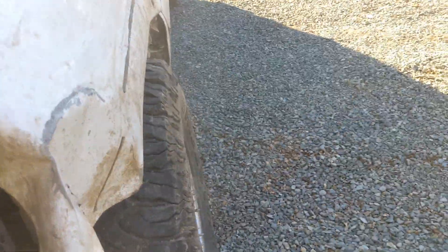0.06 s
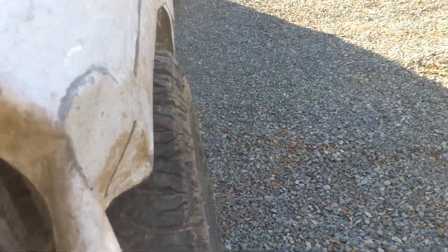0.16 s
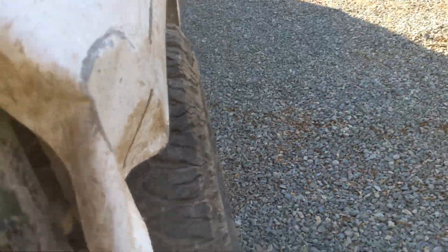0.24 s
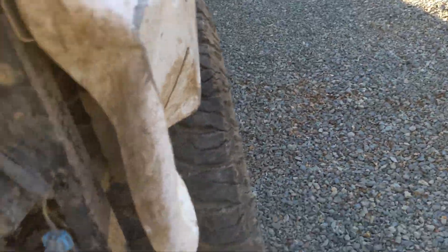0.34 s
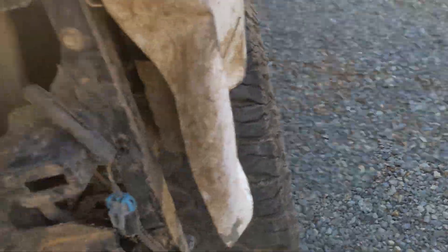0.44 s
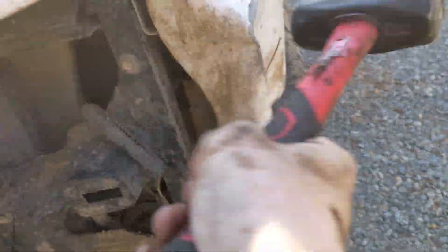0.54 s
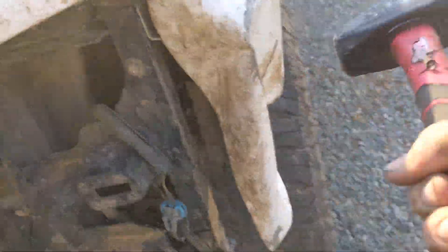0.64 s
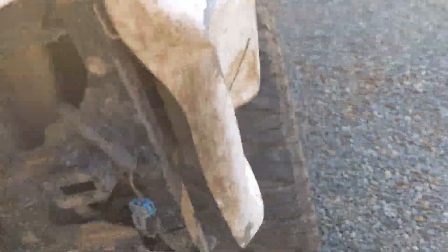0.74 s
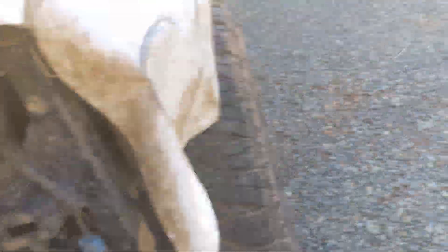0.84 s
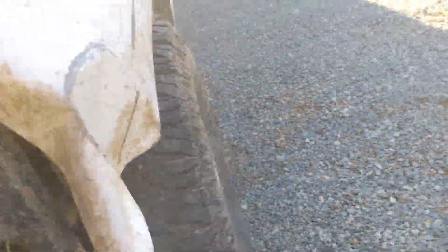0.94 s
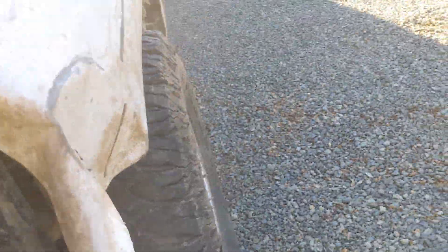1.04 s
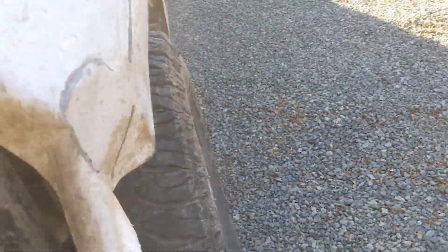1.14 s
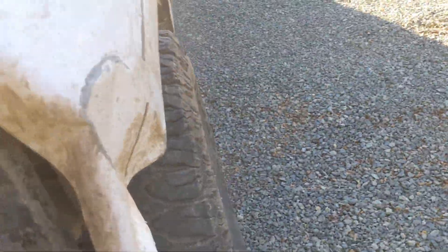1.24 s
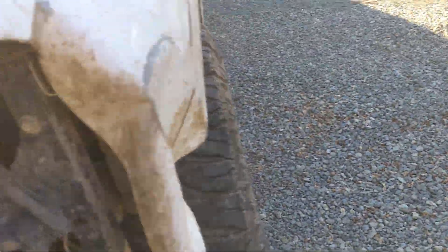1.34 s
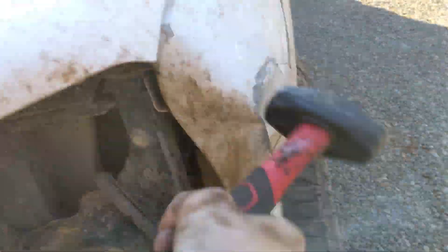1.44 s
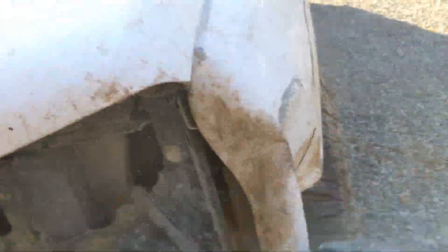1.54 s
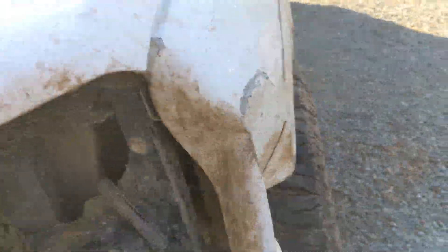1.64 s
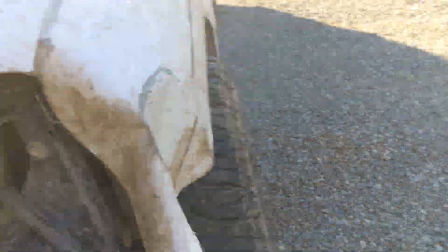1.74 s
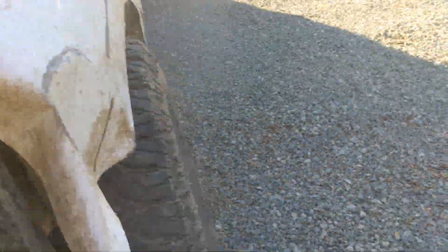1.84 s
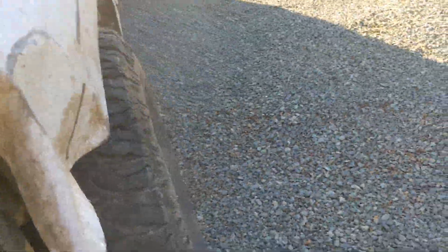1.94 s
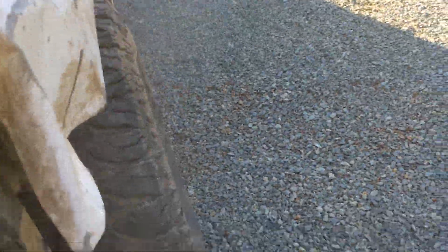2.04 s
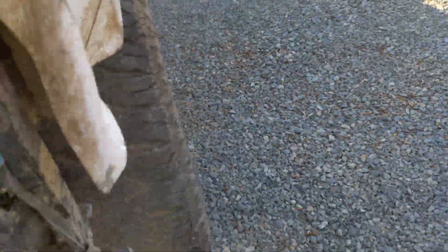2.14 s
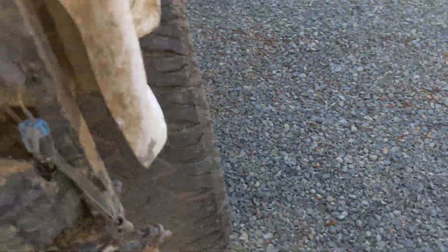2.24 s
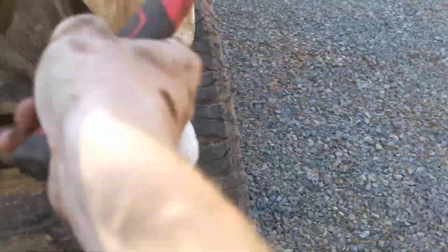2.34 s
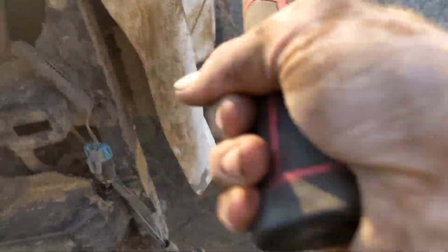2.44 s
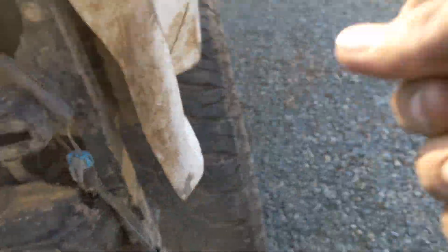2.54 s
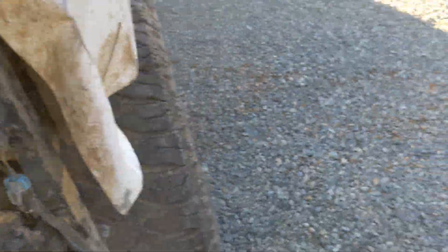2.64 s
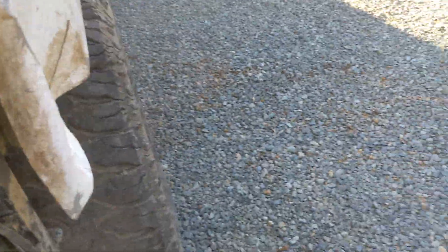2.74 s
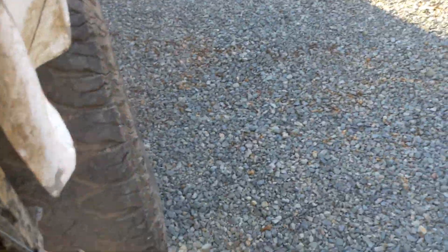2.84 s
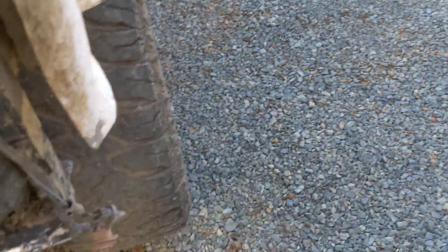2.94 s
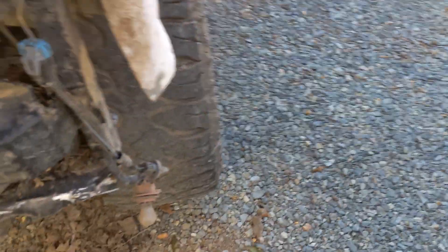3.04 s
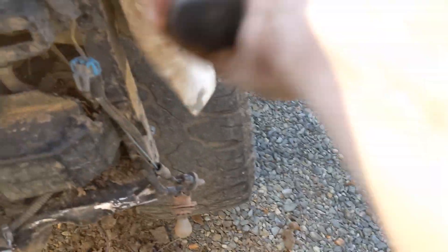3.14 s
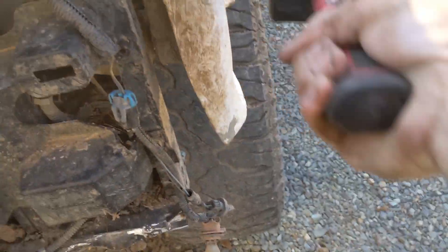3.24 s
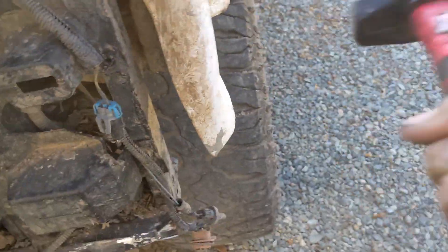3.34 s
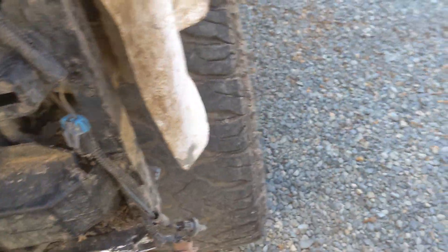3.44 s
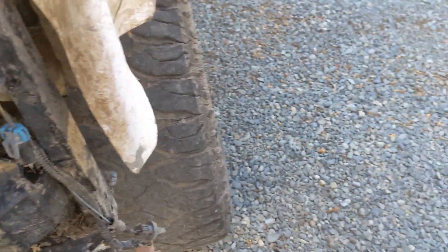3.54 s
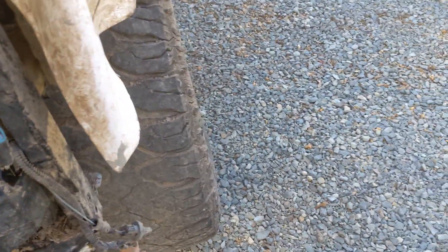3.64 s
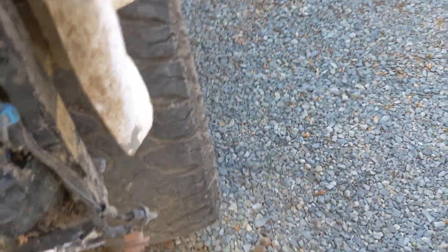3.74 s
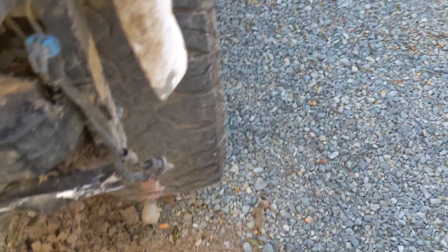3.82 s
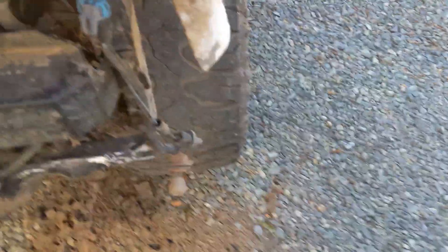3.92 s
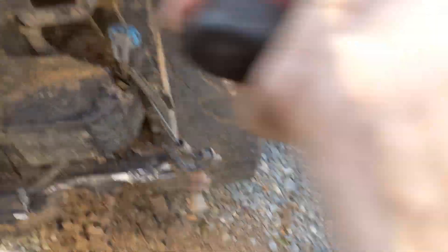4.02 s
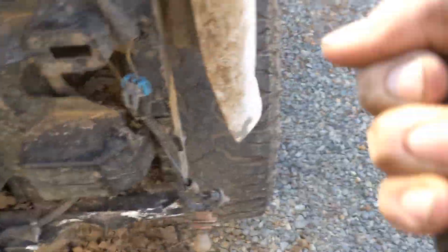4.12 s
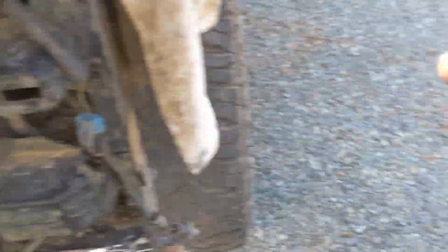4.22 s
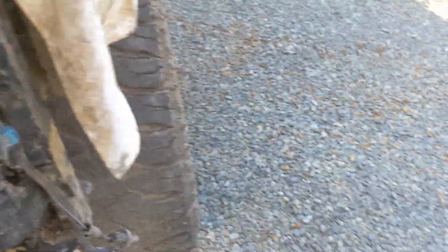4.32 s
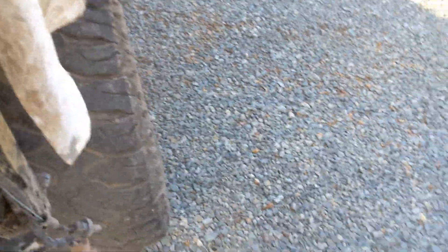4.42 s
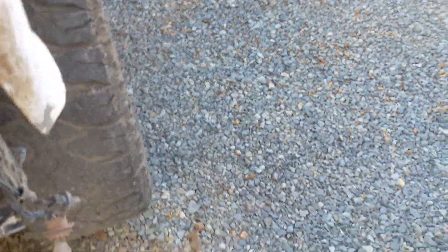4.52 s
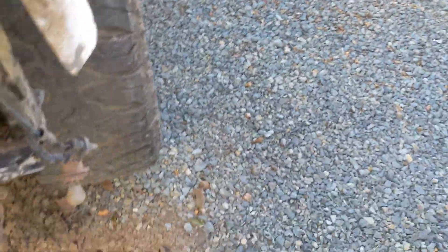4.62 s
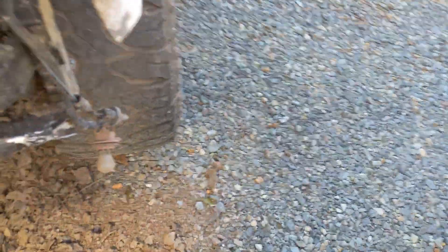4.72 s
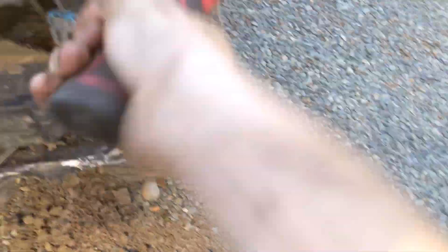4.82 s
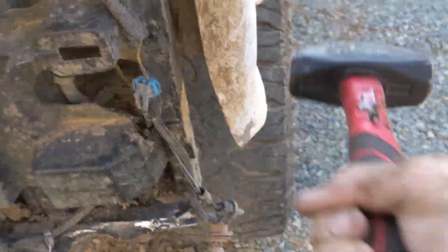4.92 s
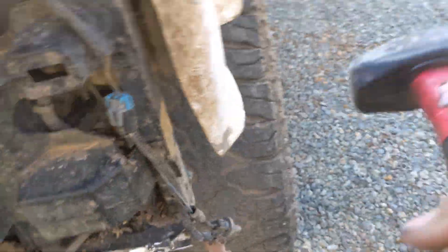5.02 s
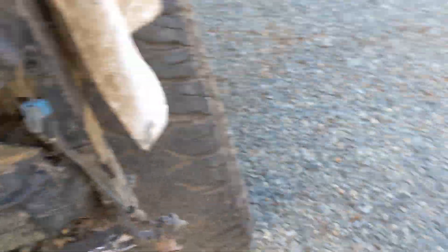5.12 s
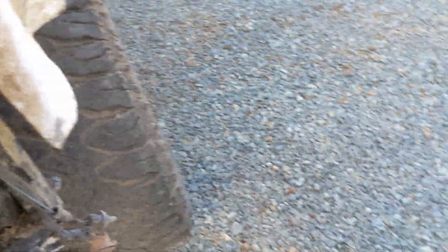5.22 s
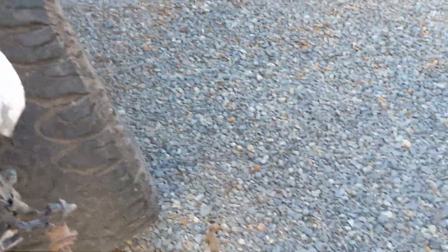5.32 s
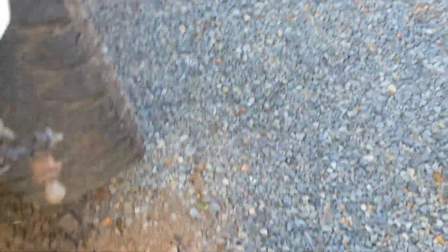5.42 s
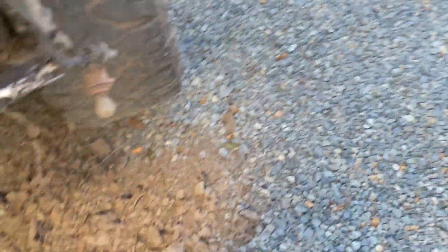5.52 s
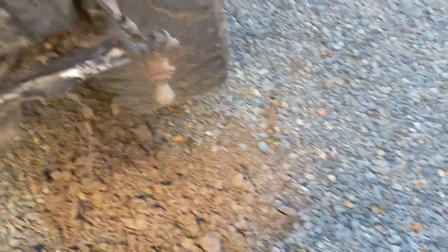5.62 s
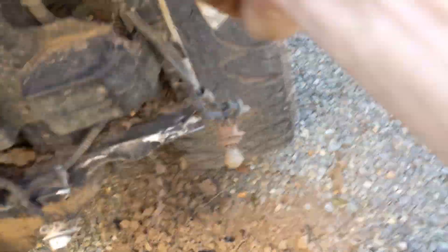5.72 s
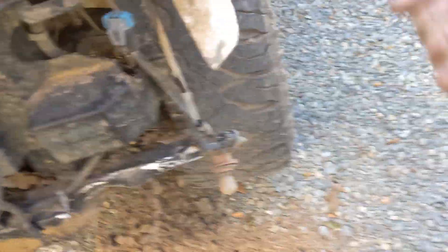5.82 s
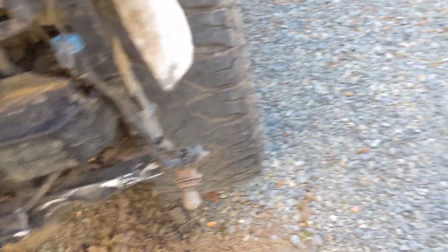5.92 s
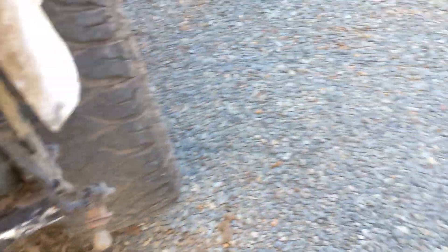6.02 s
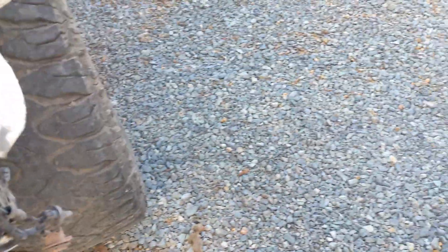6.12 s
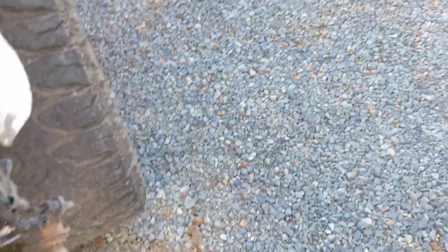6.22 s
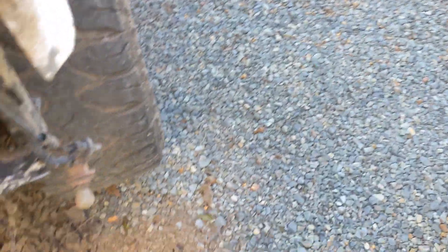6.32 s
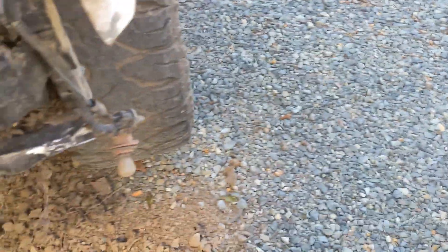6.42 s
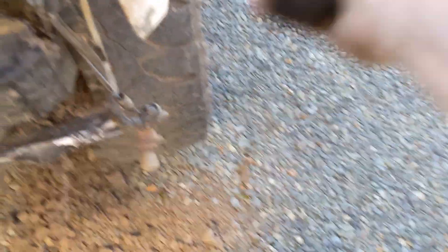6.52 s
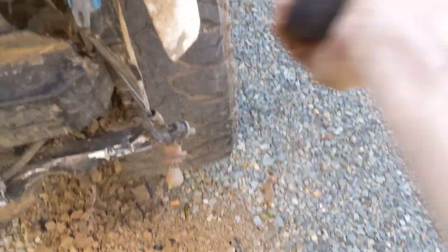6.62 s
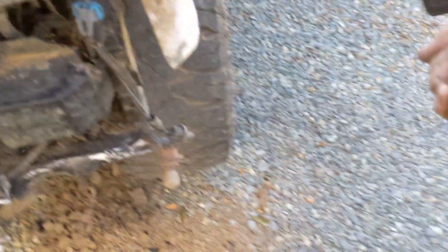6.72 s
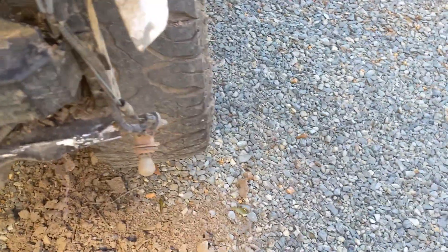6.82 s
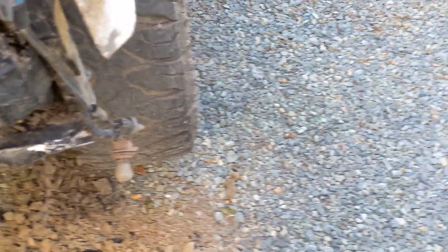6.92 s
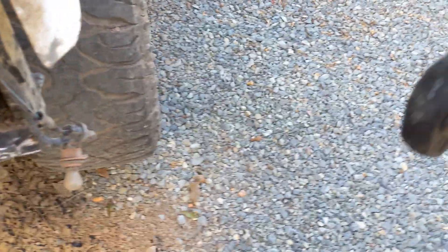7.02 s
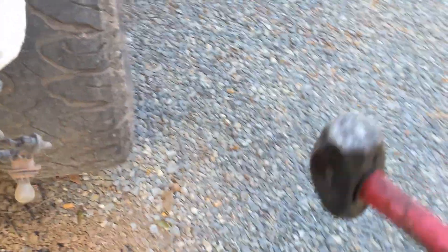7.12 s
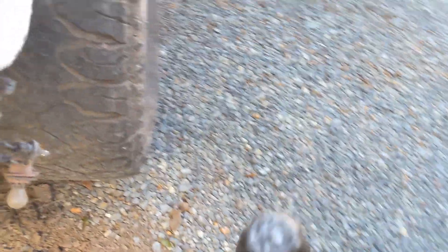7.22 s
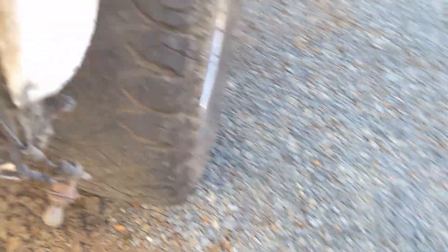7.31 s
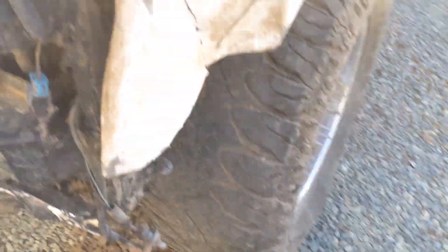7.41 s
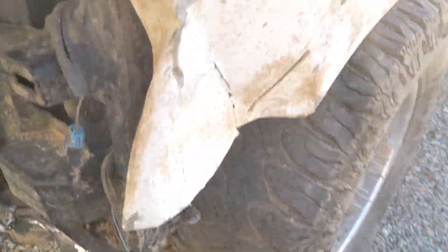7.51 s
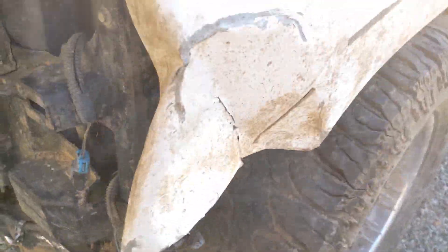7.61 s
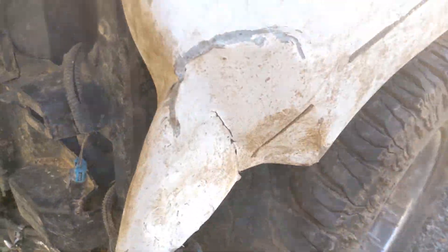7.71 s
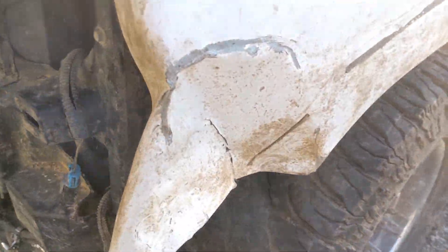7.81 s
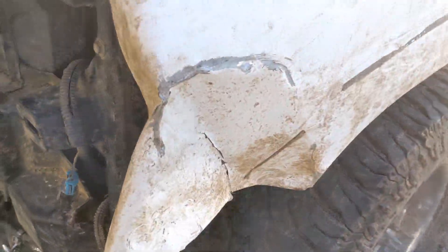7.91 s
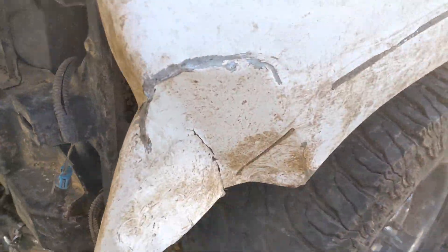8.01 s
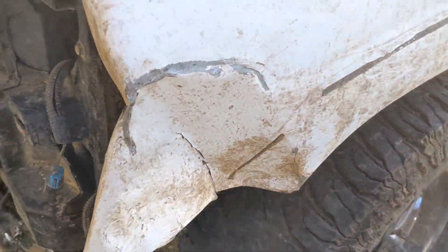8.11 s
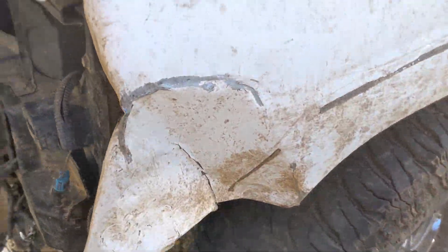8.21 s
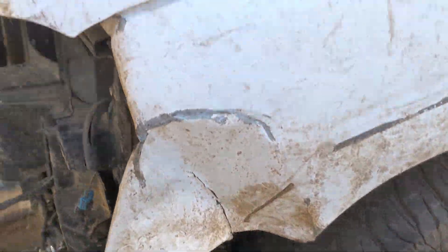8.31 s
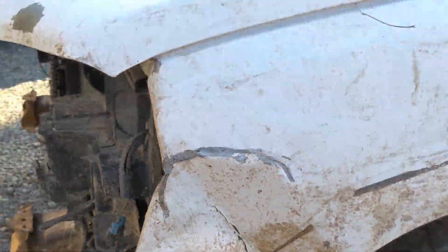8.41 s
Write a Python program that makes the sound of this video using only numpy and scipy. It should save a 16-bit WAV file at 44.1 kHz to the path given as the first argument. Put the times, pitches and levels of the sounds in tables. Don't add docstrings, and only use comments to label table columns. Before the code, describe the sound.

In an open gravel yard, a steel hammer strikes a muddy fender close to the microphone. The tail of one blow opens, then eight more follow a little under a second apart, each a sharp crack with clang, booming sheet and gritty hiss. Mud crumbs and clips patter between. Afterwards the handle taps the tyre and boots crunch on gravel over faint far traffic.

```python
import sys
import numpy as np
from scipy import signal
from scipy.fft import rfft, irfft
from scipy.io import wavfile
from scipy.ndimage import uniform_filter1d

SR = 44100
rng = np.random.default_rng(int(sys.argv[2]) if len(sys.argv) > 2 else 0)


def magnitude_from_level(level_db):
    exponent = np.asarray(level_db, float) / 20
    return 10 ** exponent


def bounce(signal):
    frames = np.transpose(np.atleast_2d(signal))
    limited = np.clip(frames, -1, 1)
    pcm = np.round(limited * 32767).astype(np.int16)
    wavfile.write(sys.argv[1], SR, pcm)


N = 373076

# (time [s], level [dB], boom below 500 Hz [dB], ring length [factor], grit level [dB])
BLOWS = [
    (-.31, -9, 1, 1.56, -47.5),
    (0.609, -2.5, -3.1, 1.43, -46),
    (1.525, -4, -2.5, 1.39, -48),
    (2.413, -2.5, -4.5, 1.53, -46),
    (3.241, -4.5, -0.5, 1.37, -43),
    (4.07, -2, -5.5, 1.47, -47),
    (4.905, -9.5, 12, 1.06, -47),
    (5.788, -7, 3.5, 1.06, -48.5),
    (6.643, -4.5, -2.5, 1.137, -62.5),
]
# (time [s], crack level [dB], clang [Hz], upper clang [Hz], clang level [dB])
CONTACTS = [
    (0.61, -3, 910, 2555, -5.5),
    (1.5246, -2, 1290, 2344, -6.5),
    (2.413, -5.5, 826, 2410, -4.5),
    (3.241, -7, 870, 1685, 0),
    (4.071, -4.5, 950, 1613, -0.5),
    (4.905, -4.5, 723, 2960, -13.5),
    (5.789, -4, 1330, 1540, -12.5),
    (6.643, -5.5, 945, 2127, -2.5),
]
# (frequency [Hz], level per Hz [dB])
CRACK_COLOUR = [(59, -55), (100, -11.5), (338, -2), (628, -4), (922, -0.5), (1750, -8.5), (2210, -3.5),
                (2520, -4), (3250, -9), (6000, -16.5), (11000, -28), (14800, -33.5), (16500, -55)]
# (frequency [Hz], level per Hz [dB])
SPIT_COLOUR = [(1500, -29.5), (4000, -7.5), (5600, -2.5), (8000, -4.5), (15000, -3.5), (16800, -30)]
# (frequency [Hz], level per Hz [dB])
SHIVER_COLOUR = [(18, -24), (30, 3), (55, -9.5), (100, 5.5), (268, 4.5), (519, -3), (659, -8), (1120, -8.5),
                 (1750, -19), (2740, -25), (3900, -39), (4800, -36.5), (5600, -44), (6000, -53.5)]
# (frequency [Hz], T60 [s])
SHIVER_T60 = [(40, 0.92), (150, 0.46), (400, 0.53), (1000, 0.57), (2500, 0.68), (5000, 0.71), (9000, 0.3),
              (15000, .3)]
# (frequency [Hz], level [dB], T60 [s])
CLEAR_MODES = [(60.67, -1, 0.62), (133.6, -12, 0.36), (151, -3, 1), (199.1, -1, 0.45), (227.3, -8.5, 0.75),
               (250, -3, 0.54), (264.1, 0, 0.31), (280.2, -3.5, 0.44), (143, -21.5, 1.3),
               (371, -26, 0.39), (367.2, -7, 0.37), (425.3, -7.5, 0.55), (534, -17.5, 0.91),
               (562, -12.5, 0.6), (612, -30, 0.63), (713, -16, 0.25), (837, -20, 0.23), (899, -9, 0.38),
               (933, -14.5, 0.66), (1020, -15, 0.47), (1118, -16.5, 0.3), (1254, -16.5, 0.3),
               (1460, -17.5, 0.22)]
# (frequency [Hz], level per Hz [dB])
GRIT_COLOUR = [(1500, -22.5), (3000, 15.5), (6000, -3), (10000, -8), (15500, -4.5), (17000, -30.5)]
# (time [s], rms level [dB], frequency [Hz], T60 [s])
HUMS = [(-.3, -42.5, 285, 3.2), (0.608, -41.5, 298, 5.1), (1.53, -40.5, 290, 1.7), (2.42, -44.5, 295, 2.87),
        (2.42, -44.5, 660, 1.7), (3.249, -51, 289, 4), (3.25, -45, 520, 1.9), (3.248, -29.5, 1166, 0.9),
        (3.25, -44.5, 2670, 1.3), (3.248, -52.5, 2900, 1.8), (4.08, -46.5, 277, 3),
        (4.081, -49.5, 2700, 1.8), (4.912, -40.5, 280, 2.6), (5.8, -49.5, 294, 7.3), (6.65, -40, 289, 2.4)]
# (time [s], peak level [dB], colour [Hz])
RATTLES = [(2.6, -48, 5000), (3.627, -18.5, 3730), (4.225, -36.5, 4760), (4.34, -38.5, 4570),
           (4.385, -58, 8330), (5.12, -41, 5600), (5.158, -52, 4900), (5.187, -45.5, 4560),
           (6.735, -29, 5520), (6.8, -42, 4900), (6.86, -42, 5000)]
# (time [s], peak level [dB])
CRUMBS = [(0.1865, -33), (0.3631, -39.5), (0.8392, -30), (0.8994, -45.5), (1.0696, -32), (1.269, -50),
          (1.4951, -37.5), (2.146, -47), (2.324, -38.5), (2.8163, -48.5), (3.2161, -39), (3.4284, -30),
          (3.4705, -32), (3.5514, -37.5), (3.73, -40), (3.9164, -53), (3.977, -34), (4.3788, -40),
          (4.816, -30.5), (5.4582, -43), (6.5477, -49.5), (5.8816, -25), (6.2555, -41), (7.2455, -54)]
# (time [s], peak level [dB], colour [Hz])
CHIPS = [(1.292, -47, 4620), (1.975, -43, 2770), (2.1251, -44, 4010), (2.365, -47.5, 3460),
         (3.1404, -42, 3990), (3.9894, -46, 6500), (4.7932, -38.5, 8900), (4.5474, -57, 4500),
         (6.278, -46, 5450), (7.1812, -49, 3580), (7.37, -36, 3650), (7.5262, -48.5, 6900)]
# (time [s], peak level [dB], colour [Hz])
BUMPS = [
    (1.151, -34.5, 299),
    (1.42, -28.5, 294),
    (2.236, -41.5, 145),
    (2.363, -23.5, 151),
    (3.822, -34, 143),
    (4.671, -31, 145),
    (4.869, -41, 143),
    (5.423, -33, 294),
    (7.228, -25.5, 278),
    (7.558, -28, 187),
]
# (time [s], peak level [dB], roll-off [Hz])
SNAPS = [
    (1.152, -38, 900),
    (1.4225, -33, 900),
    (2.236, -43, 900),
    (2.365, -32, 900),
    (3.8245, -33, 700),
    (7.5605, -33, 900),
    (7.646, -38, 900),
    (7.676, -30, 900),
    (7.683, -31, 900),
]
# (frequency [Hz], level [dB], T60 [s])
PING_MODES = [(2790, 2, .09), (3130, 2, .07), (3860, 3, .06), (4050, 1, .06), (4770, 2, .06),
              (5100, 2, .05), (5500, 0, .05), (6100, -3, .05), (8000, -7, .05)]
# (frequency [Hz], level [dB], T60 [s])
TAP_MODES = [(900, -6, .02), (1150, -2, .025), (1330, 0, .03), (1550, -2, .025), (1950, -7, .02),
             (2900, -12, .015)]
# (time of most weight [s], level [dB], loading [s], unloading [s])
STEPS = [
    (7.272, -48, .05, .08),
    (7.476, -62, .036, .03),
    (7.681, -43, .04, .035),
    (7.725, -56, .03, .07),
    (8.228, -62, .016, .03),
    (8.34, -54, .08, .12),
]
# (frequency [Hz], level per Hz [dB])
GRAVEL_COLOUR = [(100, -20), (300, -6), (800, -2), (1100, 0), (1500, -5), (2000, -13), (4900, -22),
                 (6200, -32), (14400, -37), (16500, -55)]
# (frequency [Hz], level per Hz [dB])
YARD_COLOUR = [(12, -25), (22, -4), (45, 0), (110, -1), (200, -8), (300, -9), (400, -15), (900, -20),
               (1400, -26), (2300, -26), (5400, -35), (6300, -43), (14500, -45), (16500, -58)]
# (time [s], level [dB])
YARD_LEVEL = [(0, -51.5), (1.3, -50), (4.2, -52.5), (6.4, -51), (7.2, -52.5), (7.95, -56), (8.46, -54)]
# (frequency [Hz], likeness [0-1])
SAME = [(30, .62), (60, .86), (150, .97), (300, .95), (700, .78), (1400, .56), (3000, .54), (8000, .64)]
# (frequency [Hz], level [dB])
LEAN = [(40, -0.5), (250, -1.8), (1400, -1.5), (2800, 3.5), (5500, -2.5), (10000, -6), (14000, -5)]
# (frequency [Hz], phase [rad])
TRAIL = [(30, .5), (150, .12), (350, .2), (700, .4), (1400, 1.0), (2800, 1.25), (5600, 1.6), (14000, 1.4)]

BRIGHT_DB, BRIGHT_PER_BOOM = 2.48, .18
REBOUND_S, REBOUND_WIDTH_S = .092, .058
REBOUND_DB, REBOUND_PER_BOOM = 8, -.35
FRAME_SHARE = 0.82
THUMP_DB = -7.5
SPIT_DB, SPIT_T60_S, SPIT_LEAD_S = -9, 0.056, .002
RATTLE_T60_S, RATTLE_TREBLE_DB = 0.045, -34
CRUMB_HZ, CRUMB_T60_S, CRUMB_TREBLE_DB = 2650, .042, -9
CHIP_T60_S, CHIP_TREBLE_DB = 0.12, -16.5
BUMP_T60_S, BUMP_TREBLE_DB = .06, -42
PING_S, PING_DB = 3.626, -36
TAP_S, TAP_DB = 7.358, -29
STEP_EDGE_DB = -15
EDGE_HZ = 16750


def hammer():
    out, t = np.zeros((2, N)), np.arange(2 ** 16) / SR
    end = np.clip(10 * (t[-1] - t), 0, 1)
    for s, db, boom_db, ring, grit_db in BLOWS:
        tilt = BRIGHT_DB + BRIGHT_PER_BOOM * boom_db
        blow = magnitude_from_level(-16.5) * shiver(t, boom_db, tilt, ring)
        blow += magnitude_from_level(-21.5) * modes(t, boom_db, tilt, ring)
        blow += magnitude_from_level(grit_db) * grit(t, ring)
        blow += magnitude_from_level(-42.5) * flecks(t, ring)
        rock = np.exp(-((t - REBOUND_S * ring) / REBOUND_WIDTH_S) ** 2)
        swell_db = (REBOUND_DB + REBOUND_PER_BOOM * boom_db) * rock
        add(out, s, magnitude_from_level(db + swell_db) * blow * end)
    for s, crack_db, clang_hz, upper_hz, clang_db in CONTACTS:
        add(out, s - .001, contact(crack_db, clang_hz, upper_hz, clang_db))
        add(out, s - SPIT_LEAD_S, magnitude_from_level(crack_db) * spit())
    for s, db, hz, t60 in HUMS:
        hum = struck(t, [(hz, db + 1.5, t60)])
        add(out, s, hum * magnitude_from_level(1.9 * wobble(len(t), size=1500)) * end)
    return out


def contact(db, clang_hz, upper_hz, clang_db):
    t = np.arange(2 ** 14) / SR
    crack = coloured(rng.standard_normal((2, len(t))), CRACK_COLOUR)
    crack = crack * (magnitude_from_level(-60 * t / 0.11) + magnitude_from_level(-9.5 - 60 * t / 0.29))
    clang = struck(t, [(clang_hz, clang_db + 5, .06), (upper_hz, clang_db + 3.0, .05)])
    thump = np.sin(2 * np.pi * 58 * t - np.array([[.7], [0]])) * magnitude_from_level(THUMP_DB - 60 * t / .17)
    return magnitude_from_level(db) * (crack + clang + thump) * (1 - np.exp(-(t / .0018) ** 2))


def spit():
    t = np.arange(2 ** 12) / SR
    burst = coloured(rng.standard_normal((2, len(t))), SPIT_COLOUR)
    return burst * magnitude_from_level(SPIT_DB - 60 * t / SPIT_T60_S) * (1 - np.exp(-(t / .003) ** 2))


def shiver(t, boom_db, tilt, ring):
    z, hz = ports(*rng.standard_normal((2, len(t))), SHIVER_COLOUR, tilt)
    z = z / np.sqrt(np.mean(irfft(z, len(t)) ** 2)) * magnitude_from_level(boom_db * boom(hz))
    z = z * magnitude_from_level(2.33 * wobble(len(hz), size=16) - 1.33)
    chatter_db = 1.3 * wobble(len(t), size=300)
    out, step = np.zeros((2, len(t))), t[::64]
    for centre in 30 * 2 ** (np.arange(25) / 3):
        band = np.cos(np.pi * np.clip(1.5 * np.log2((hz + 1) / centre), -.5, .5)) ** 2
        patch = np.interp(t, step, wobble(len(step), size=25))
        fade_db = -60 * (t - .12) / (ring * read(SHIVER_T60, centre))
        fade_db = fade_db + chatter_db * min(centre / 2000, 1) + 1.9 * patch
        rise = 1 - np.exp(-t * centre / 0.5)
        out += irfft(z * band, len(t)) * magnitude_from_level(fade_db) * rise
    return out


def modes(t, boom_db, tilt, ring):
    hz, db, t60 = np.transpose(CLEAR_MODES)[:, :, None]
    spot, bend, phase, side = rng.standard_normal((4, len(hz), 1))
    db = db + 3.5 * spot + boom_db * boom(hz) + tilt * np.log2((hz + 50) / 1000)
    turn = 2 * np.pi * (hz * (1 + .008 * bend) * t + phase)
    fade = magnitude_from_level(db - 60 * (t - .12) / (ring * t60)) * (1 - np.exp(-t * hz / 1.1))
    skew = .4 * side * np.minimum(hz / 700, 2) + read(TRAIL, hz)
    left = (fade * np.sin(turn - skew)).sum(0)
    right = (fade * np.sin(turn)).sum(0)
    return np.array([left, right])


def boom(hz):
    above_frame = 1 / (1 + (100 / (hz + 1)) ** 4)
    return (FRAME_SHARE + (1 - FRAME_SHARE) * above_frame) / (1 + (hz / 500) ** 2)


def grit(t, ring):
    grains = rng.standard_normal((2, len(t))) * magnitude_from_level(2.7 * rng.exponential(1, len(t)))
    fade_db = -60 * (t - .12) / (0.71 * ring) + 1.8 * wobble(len(t), size=400)
    return coloured(grains, GRIT_COLOUR) * magnitude_from_level(fade_db) * (1 - np.exp(-t / 0.0054))


def flecks(t, ring):
    out, short = np.zeros((2, len(t))), t[:4096]
    for when, pitch, size, length in rng.random((30, 4)):
        s = .04 + .33 * ring * when ** 1.5
        hz = 2600 * 3.2 ** (pitch ** 1.3)
        db = -60 * s / ring + 12 * size - 10 * pitch
        t60 = 0.027 + 0.073 * length ** 2
        cluster = [(hz * ratio, db, t60) for ratio in (.96, 1, 1.03)]
        add(out, s, struck(short, cluster) * (1 - np.exp(-short / .003)))
    return out


def struck(t, table):
    hz, db, t60 = np.transpose(table)[:, :, None, None]
    trail = read(TRAIL, hz) * np.array([[1], [0]])
    fade = magnitude_from_level(db - 60 * t / np.minimum(t60, 4))
    return (fade * np.sin(2 * np.pi * hz * t - trail)).sum(0)


def knocks(rows, t60, skirt_db, treble_db):
    out, t = np.zeros((2, N)), np.arange(2 ** 13) / SR
    shape = magnitude_from_level(-60 * t / t60) * (1 - np.exp(-t / (.03 * t60)))
    levels = [skirt_db - 15.5, skirt_db, 0, -5, treble_db]
    for s, db, hz in rows:
        corners = [30, hz / 1.6, hz, hz * 1.4, max(14000, hz * 1.6)]
        burst = coloured(rng.standard_normal((2, len(t))), list(zip(corners, levels)))
        add(out, s, burst * magnitude_from_level(db - 12.0) * shape)
    return out


def pings():
    out, t = np.zeros((2, N)), np.arange(2 ** 14) / SR
    for s, db, table in (PING_S, PING_DB, PING_MODES), (TAP_S, TAP_DB, TAP_MODES):
        add(out, s, magnitude_from_level(db) * struck(t, table) * (1 - np.exp(-t / .0006)))
    for s, db, hz in SNAPS:
        u = 2 * np.pi * hz * t
        push = np.exp(-u) - np.exp(-4 * u)
        recoil = .22 * u * np.exp(-u / 2)
        add(out, s, magnitude_from_level(db + 6) * (push - recoil))
    return out


def boots():
    out = np.zeros((2, N))
    for s, db, rise, fall in STEPS:
        t = np.arange(-rise, fall, 1 / SR)
        snaps = rng.standard_normal((2, len(t))) * magnitude_from_level(2.2 * rng.exponential(1, len(t)))
        snaps = snaps * (rng.random(len(t)) < 4000 / SR)
        weight_db = db + 4 + STEP_EDGE_DB * np.where(t < 0, -t / rise, t / fall)
        weight_db = weight_db + 2.5 * wobble(len(t), size=250)
        crunch = coloured(snaps, GRAVEL_COLOUR) * magnitude_from_level(weight_db)
        add(out, s - rise, crunch * signal.windows.tukey(len(t), .3))
    return out


def yard():
    z, hz = ports(*rng.standard_normal((2, N)), YARD_COLOUR)
    out = np.zeros((2, N))
    for centre in 20 * 2. ** np.arange(11):
        band = np.cos(np.pi * np.clip(np.log2((hz + 1) / centre) / 2, -.5, .5)) ** 2
        out += irfft(z * band, N) * magnitude_from_level(2.0 * wobble(N, size=2500))
    level_db = np.interp(np.arange(N) / SR, *np.transpose(YARD_LEVEL))
    return evened(out) * magnitude_from_level(level_db + 0.4 * wobble(N, size=8000))


def ports(a, b, colour, tilt=0.):
    hz = np.fft.rfftfreq(len(a), 1 / SR)
    same = np.clip(read(SAME, hz), 0, 1)
    right = rfft(a)
    left = same * right + np.sqrt(1 - same ** 2) * rfft(b)
    left = left * np.exp(-1j * read(TRAIL, hz))
    lean = magnitude_from_level(read(LEAN, hz) / 2)
    gain = magnitude_from_level(read(colour, hz) + tilt * np.log2((hz + 50) / 1000))
    return np.array([left * lean, right / lean]) * gain, hz


def coloured(noise, colour):
    z, _ = ports(*noise, colour)
    return evened(irfft(z, noise.shape[1]))


def wobble(count, size):
    return evened(uniform_filter1d(uniform_filter1d(rng.standard_normal(count), size), size))


def evened(x):
    return x / np.sqrt(np.mean(x ** 2) + 1e-20)


def read(points, hz):
    f, value = np.transpose(points)
    return np.interp(np.log(hz + 1), np.log(f + 1), value)


def add(mix, s, sound):
    at = round(s * SR)
    sound = sound[..., max(-at, 0):]
    part = mix[:, max(at, 0):][:, :sound.shape[-1]]
    part += sound[..., :part.shape[1]]


def scene():
    mud = knocks([(s, db, CRUMB_HZ) for s, db in CRUMBS], CRUMB_T60_S, 0, CRUMB_TREBLE_DB)
    chips = knocks(CHIPS, CHIP_T60_S, -1, CHIP_TREBLE_DB)
    rattles = knocks(RATTLES, RATTLE_T60_S, -1, RATTLE_TREBLE_DB)
    bumps = knocks(BUMPS, BUMP_T60_S, -4, BUMP_TREBLE_DB)
    return hammer() + rattles + mud + chips + bumps + pings() + boots() + yard()


def top_cut(x):
    return signal.sosfilt(signal.butter(12, 16840, fs=SR, output="sos"), x)


def record(dry):
    power_db = 10 * np.log10(abs(uniform_filter1d((dry ** 2).mean(0), 300)) + 1e-12)
    fall_db = np.arange(N) * 370.0 / SR
    held_db = np.maximum.accumulate(power_db + fall_db) - fall_db
    over_db = np.maximum(held_db + 26, 0)
    lag = np.exp(-1 / (0.0066 * SR))
    cut_db = signal.lfilter([1 - lag], [1, -lag], 0.52 * over_db)
    loud = 1.087 * np.tanh(dry / magnitude_from_level(cut_db) / 0.97)
    edge = signal.firwin(255, EDGE_HZ, window=("kaiser", 9), fs=SR)
    return top_cut(signal.oaconvolve(loud, edge[None], "same"))


dry = scene()
out = record(dry)
bounce(out)
```